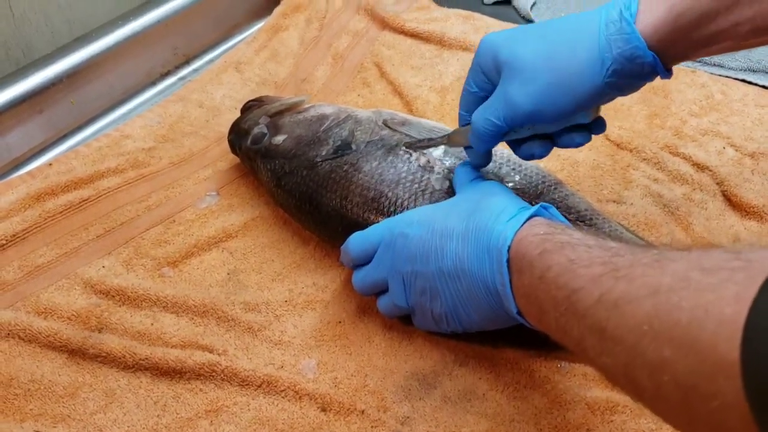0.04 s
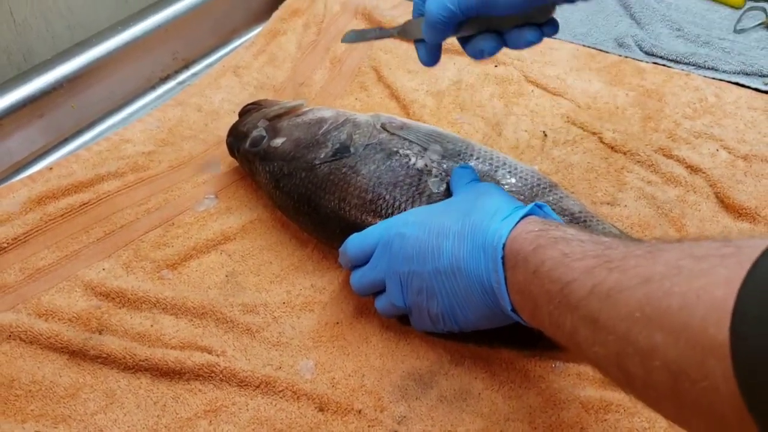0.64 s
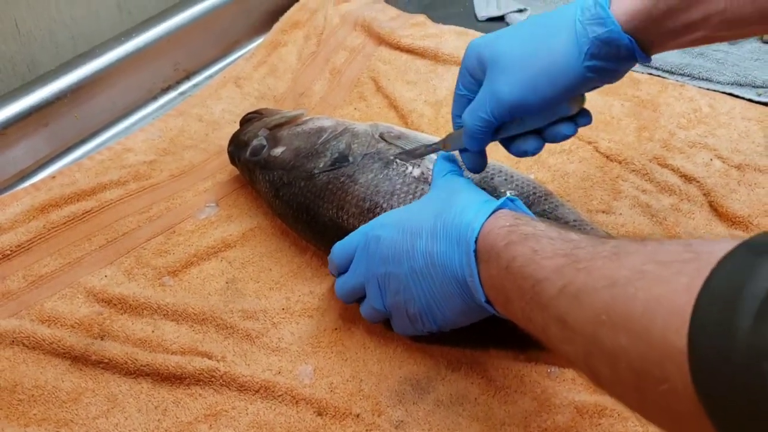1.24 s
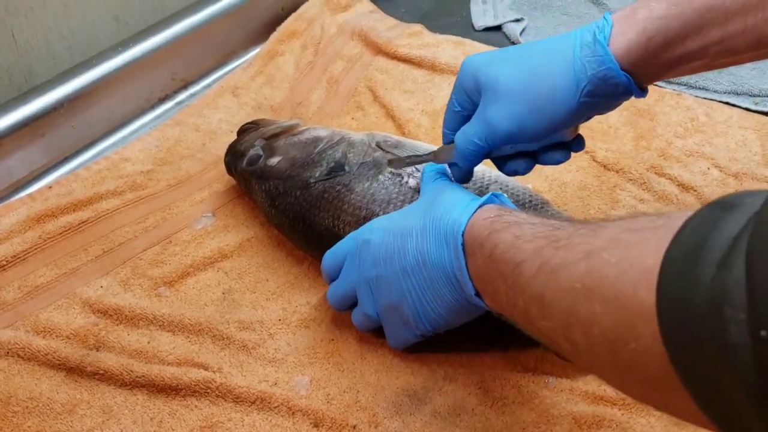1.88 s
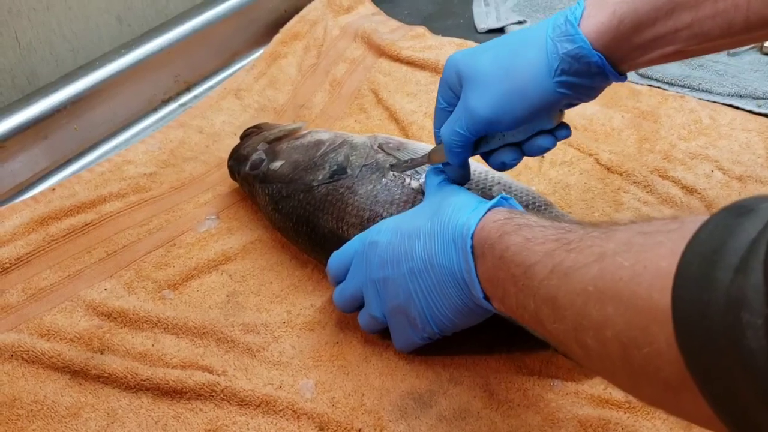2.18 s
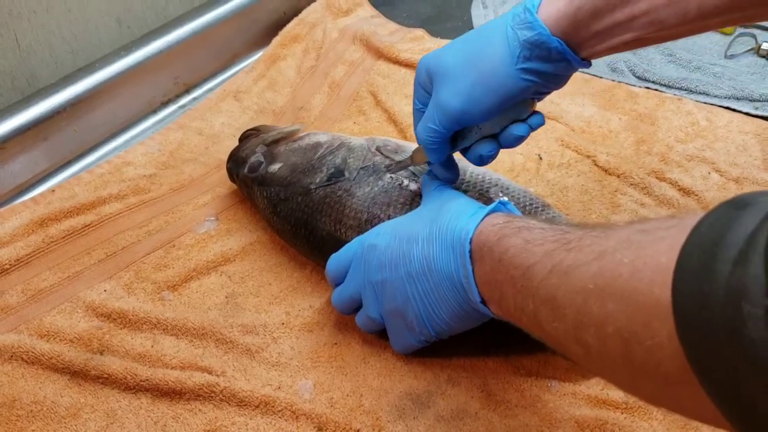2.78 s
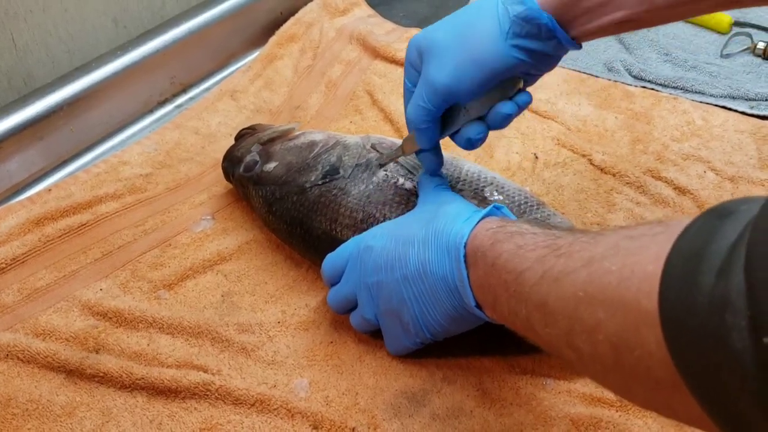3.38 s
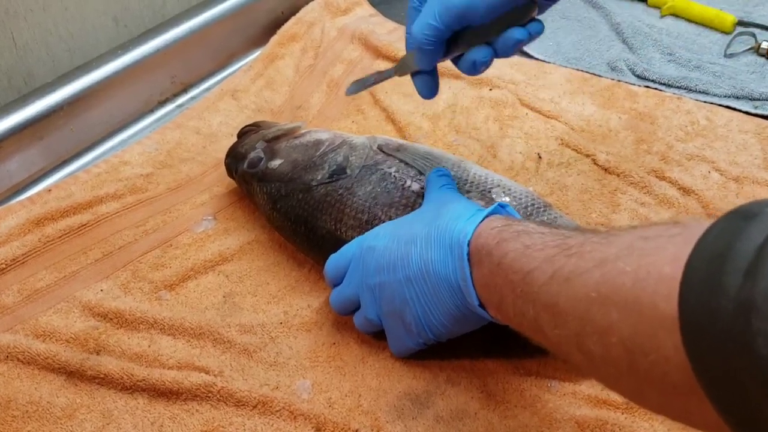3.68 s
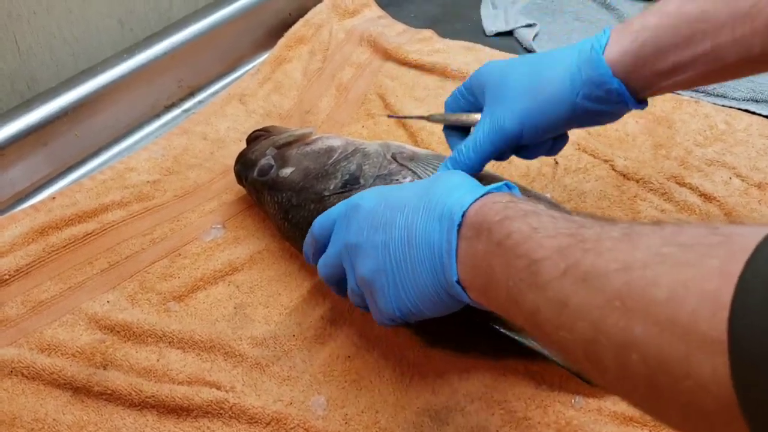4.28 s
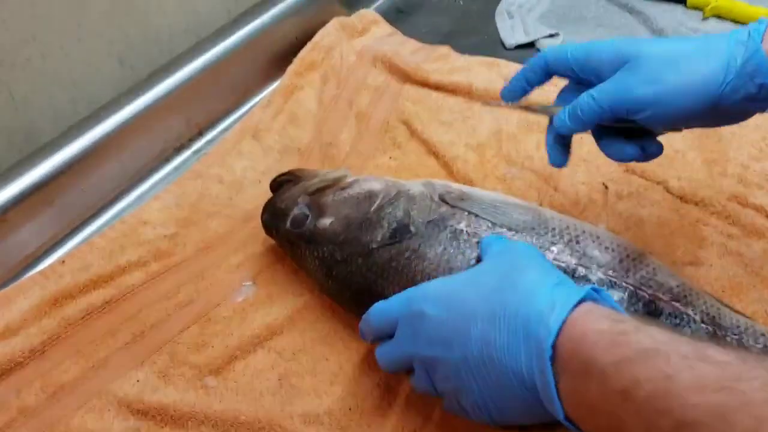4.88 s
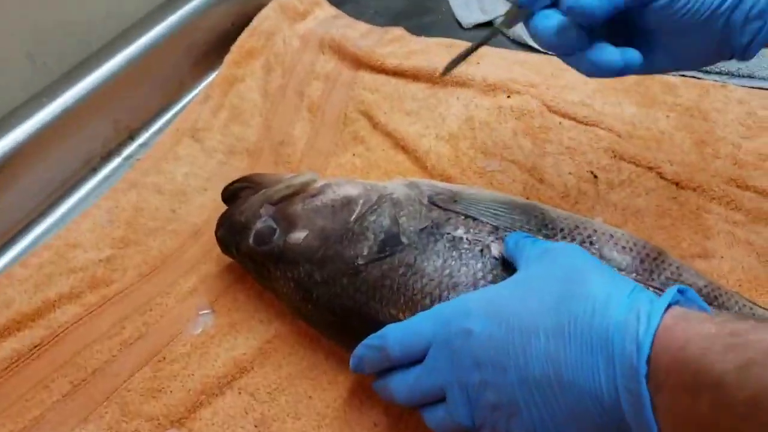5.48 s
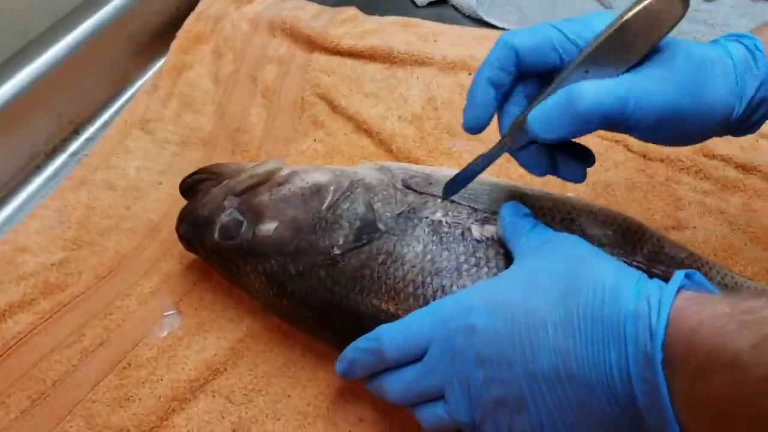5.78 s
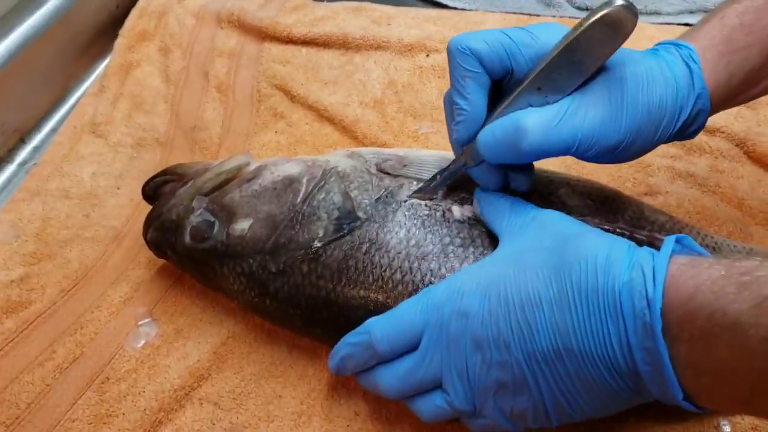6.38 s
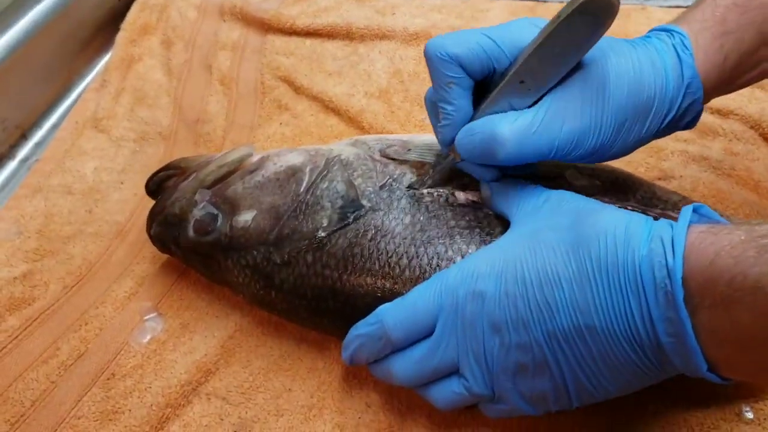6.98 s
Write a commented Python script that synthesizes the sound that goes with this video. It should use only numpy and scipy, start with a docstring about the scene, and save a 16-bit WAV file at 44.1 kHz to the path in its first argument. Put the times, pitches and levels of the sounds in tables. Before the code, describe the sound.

A scalpel picks at a fish's scales, making crisp, irregular ticks, short scrapes and faint wet rubbing. Twice, early and midway, the blade springs free with a sharp click and a brief metallic ring. A quick swipe across the skin follows, then a soft cloth rustle, more ticks and a dull thud at the end. It is heard up close in a small hard-walled room with low ventilation rumble.

```python
"""Scaling a fish with a scalpel

The fish lies on a towel in a small hard-walled room. Friction makes the edge scrape and squeak, and
scales tick as they fracture. Twice the blade springs free and rings in its modes, and once it swipes
across the skin. Jolts thud dully, loudest at the end. A sleeve rustles; ventilation rumbles behind."""
import sys
import numpy as np
from scipy import signal
from scipy.fft import rfft, irfft, next_fast_len
from scipy.io import wavfile
from scipy.ndimage import uniform_filter1d, map_coordinates

SR = 44100
rng = np.random.default_rng(int(sys.argv[2]) if len(sys.argv) > 2 else 0)


def inscribe(sig):
    """Save sig as 16-bit PCM at rate SR to the path in sys.argv[1].

    A 1-D sig is mono; a 2-D sig holds one channel per row.
    Samples are clipped to [-1, 1] before scaling.
    """
    pcm = np.round(np.clip(np.atleast_2d(sig).T, -1, 1) * 32767)
    wavfile.write(sys.argv[1], SR, pcm.astype(np.int16))


N = 319398
TIME = np.arange(N) / SR
EVENT_N, LEAD_S = SR // 2, 0.12
EVENT_TIME = np.arange(EVENT_N) / SR - LEAD_S  # time around one event [s]


def amp(db):
    """Decibels to amplitude gain."""
    return 10 ** (np.asarray(db) / 20)


def unit(x):
    """Scale to rms 1."""
    return x * (np.mean(x * x) + 1e-20) ** -.5


def along(points, hz):
    """Interpolate (frequency [Hz], value) points on a logarithmic frequency axis."""
    knots_hz, values = np.transpose(points)
    return np.interp(np.log(hz + 1), np.log(knots_hz + 1), values)


def wobble(rate):
    """A smooth random curve with rate knots a second."""
    return map_coordinates(rng.standard_normal(int(N * rate / SR) + 4), [TIME * rate])


def burst(t, rise_s, fall_s):
    """An envelope that grows exponentially to 1 at t = 0, then decays."""
    return np.exp(-np.abs(t) / (np.where(t < 0, rise_s, fall_s) + 1e-5))


def noise(size):
    """Independent white noise, left and right."""
    return rng.standard_normal((2, size))


def grains(size, per_s, spread_db):
    """Shot noise: tiny fractures of uneven size at random moments."""
    hits = rng.random(size) < per_s / SR
    return unit(noise(size) * hits * amp(spread_db * rng.standard_normal(size)))


def patchy(size, depth_db):
    """Noise whose level drifts in small patches of time and frequency."""
    spectra = signal.stft(noise(size), nperseg=1024)[2]
    drift = uniform_filter1d(rng.standard_normal(spectra.shape[1:]), size=4, axis=0)
    drift = uniform_filter1d(drift, size=10, axis=1)
    return signal.istft(spectra * amp(depth_db * unit(drift)), nperseg=1024)[1][:, :size]


def filtered(x, response):
    """Multiply the spectrum of x by a frequency response."""
    size = x.shape[-1]
    padded = next_fast_len(size + 2048, True)
    return irfft(rfft(x, padded) * response(np.fft.rfftfreq(padded, 1 / SR)), padded)[..., :size]


def coloured(x, spectrum, body_db=0):
    """Shape x by a spectrum, at rms 1; body lifts the part below 8 kHz."""
    return unit(filtered(x, lambda hz: amp(along(spectrum, hz) + body_db / (1 + (hz / 8000) ** 6))))


def resonance(hz, centre_hz, width_hz):
    """Response of two equal resonators in cascade, each width_hz wide."""
    return (1j * hz * width_hz / (centre_hz ** 2 - hz ** 2 + 1j * hz * width_hz)) ** 2


def resonant(x, modes):
    """Pass x through parallel resonances, at rms 1."""
    return unit(filtered(x, lambda hz: sum(amp(db) * resonance(hz, centre_hz, 2 * half_width_hz)
                                           for centre_hz, half_width_hz, db in modes)))


def narrow(size, centre_hz, width_hz):
    """Narrow-band noise, heard as a rough tone."""
    return unit(filtered(noise(size), lambda hz: resonance(hz, centre_hz, width_hz)))


def panned(x, pan_db):
    """Set the level difference, left minus right, at constant power."""
    return x * unit(amp([[pan_db / 2], [-pan_db / 2]]))


def add_event(track, time_s, x):
    """Mix x into the track with the zero of EVENT_TIME at time_s."""
    start = round((time_s - LEAD_S) * SR)
    x = x[:, max(-start, 0):max(N - start, 0)]
    start = max(start, 0)
    track[:, start:start + x.shape[1]] += x


def in_room(x, room_db):
    """Reverberation: add a diffuse tail in which each frequency decays at its own rate."""
    # room decay: (frequency [Hz], reverberation time [s])
    t60 = [(100, 0.65), (500, 0.93), (2000, 0.47), (4500, 0.38), (9000, 0.35), (15000, 0.24)]
    hz, t, spectra = signal.stft(noise(EVENT_N), SR, nperseg=256)
    decay = amp(-60 * t / along(t60, hz)[:, None])
    build_up = 1 - np.exp(-t / 0.0023)
    tail = signal.istft(spectra * decay * build_up, SR, nperseg=256)[1]
    tail /= np.linalg.norm(tail, axis=1, keepdims=True)
    return x + amp(room_db) * signal.fftconvolve(x, tail, axes=1)[:, :x.shape[1]]


def ventilation():
    """Flow noise, duct resonances and motor hum, mostly on the right, with a thin steady hiss."""
    # rumble on each side, and hiss: (frequency [Hz], relative density [dB])
    left_spectrum = [(20, 4.5), (55, 2.5), (100, -7), (170, -12.5), (300, -3), (450, 3.5), (700, -3),
                     (1050, -9.5), (1500, -18), (3000, -26), (8000, -51), (16000, -62)]
    right_spectrum = [(20, -21.5), (35, -30), (55, 6), (78, -3.5), (98, -1), (135, -12.5), (190, -13),
                      (260, -15), (430, -22.5), (600, -33), (1000, -37.5), (1500, -44), (3500, -49.5),
                      (8000, -58)]
    hiss_spectrum = [(2000, -12.5), (7500, -21.5), (10000, -8), (12000, 1), (14000, 1.5), (16000, 2)]
    # duct modes: (frequency [Hz], width [Hz], level at lean 0 [dB], level at lean 1 [dB], pan [dB])
    duct_modes = [(97.5, 36, -63.5, -60.5, -26), (121, 65, -80.5, -62, -24), (248, 19, -67.5, -65, -16),
                  (297, 140, -70.5, -93, -18.5), (423.6, 87, -64, -73.5, -4.5), (1060, 200, -96, -74, 9.5)]
    # the listener leans in: (time [s], lean [0-1])
    leaning = [(4.3, 0), (4.9, 0.94)]
    lean = np.interp(TIME, *np.transpose(leaning))
    left, right = patchy(N, depth_db=2)
    air = np.array([amp(-61.5) * coloured(left, left_spectrum),
                    amp(-49) * coloured(right, right_spectrum)])
    for hz, width_hz, back_db, near_db, pan_db in duct_modes:
        air += panned(narrow(N, hz, width_hz), pan_db) * amp(back_db + lean * (near_db - back_db))
    hum = amp(-52 + 2.4 * wobble(2.2)) * np.sin(2 * np.pi * 59.5 * TIME + 0.46 * wobble(1.7))
    hiss = amp(-67) * coloured(noise(N), hiss_spectrum)
    return air + panned(hum, -24) + panned(hiss, 6.4)


def cloth_rustles():
    """Sliding friction: sleeve and towel brush as the arm changes its grip."""
    # swells of rustling: (peak time [s], level [dB], rise [s], fall [s])
    brushes = [(3.8, -58.5, .04, 0.069), (4.729, -69.5, .04, 0.43), (5.16, -52, 0.06, 0.098),
               (5.53, -62.5, 0.034, 0.068), (5.72, -60.5, 0.041, 0.056)]
    # soft cloth: (frequency [Hz], relative density [dB])
    cloth_spectrum = [(200, -10), (500, 8.5), (950, 0.5), (1400, -10.5), (2100, -10.5), (3200, -18),
                      (6000, -48)]
    sliding = sum(amp(db) * burst(TIME - time_s, rise_s, fall_s) for time_s, db, rise_s, fall_s in brushes)
    return panned(sliding * coloured(patchy(N, depth_db=5), cloth_spectrum), -2.8)


def jolts():
    """Damped resonances: low, dull thuds, mostly on the right, each with a short slap."""
    # jolts: (time [s], thud gain [dB], slap level [dB], thud rise [s])
    jolt_events = [(0.573, -30.5, -65, 0.004), (0.603, -31.5, -35, 0.00033), (1.802, -40.5, -71, 0.0011),
                   (3.563, -33, -67, 0.0007), (4.518, -37.5, -42.5, 0.0043), (4.548, -29.5, -69, 0.018),
                   (6.08, -42, -56.5, 0.0044), (7.087, -11, -33.5, 0.028), (7.13, -24, -41, 0.0064)]
    # resonances of the thud: (frequency [Hz], width [Hz], relative level [dB])
    thud_modes = [(56.3, 9, -3.5), (98, 15, -10), (150, 41, 0.5), (226.7, 89, -1), (284, 24, -12.5),
                  (439, 100, -31)]
    # the slap: (frequency [Hz], relative density [dB])
    slap_spectrum = [(100, -5), (300, -2.5), (700, -2.5), (1200, -2), (1600, -5), (2400, -3), (3500, -17),
                     (7000, -29), (15000, -49.5)]
    out = np.zeros((2, N))
    age = np.maximum(EVENT_TIME, 0)
    for time_s, thud_db, slap_db, rise_s in jolt_events:
        thud = np.zeros(EVENT_N)
        for hz, width_hz, db in thud_modes:
            decay = np.exp(-np.pi * width_hz * age)
            thud += amp(db) * decay * np.sin(2 * np.pi * (hz * age + rng.random()))
        thud *= amp(thud_db) * (1 - np.exp(-age / rise_s))
        slap = amp(slap_db) * coloured(noise(EVENT_N), slap_spectrum)
        slap *= burst(EVENT_TIME - 0.001, 0.0017, 0.013)
        add_event(out, time_s, panned(thud, -26) + in_room(panned(slap, -1), room_db=-3))
    return out


def skin_rubbing():
    """Friction noise: edge and gloves on wet skin give a crinkling fizz over a lower rasp."""
    # spells of rubbing: (start [s], end [s], fizz level [dB], rasp level [dB])
    rubs = [(0.358, 0.54, -67, -85), (1.596, 1.8, -60, -76), (1.83, 1.98, -62.5, -69),
            (2.241, 2.3, -61.5, -88), (2.49, 2.572, -60.5, -65.5), (2.947, 3.02, -67, -75),
            (3.56, 3.83, -56.5, -64.5), (4.15, 4.99, -63, -84), (5.111, 5.359, -61, -79.5),
            (5.496, 6.006, -65, -83.5), (6.55, 6.77, -65, -80), (6.97, 7.24, -60, -70.5)]
    # the two bands of friction noise: (frequency [Hz], relative density [dB])
    fizz_spectrum = [(3000, -22), (6000, -25), (9000, -11.5), (11800, -2), (15500, -5)]
    rasp_spectrum = [(800, -17.5), (2000, 5.5), (3200, -1), (4200, 6.5), (5600, 4), (8000, 5),
                     (12000, -27.5)]
    fizz_gain, rasp_gain = amp(-75), amp(-88)  # the hands only holding on
    for start_s, end_s, fizz_db, rasp_db in rubs:
        contact = burst(TIME - np.clip(TIME, start_s, end_s), rise_s=0.02, fall_s=0.052)
        fizz_gain = np.maximum(fizz_gain, amp(fizz_db) * contact)
        rasp_gain = np.maximum(rasp_gain, amp(rasp_db) * contact)
    pressure = amp(3.1 * wobble(25))
    fizz = fizz_gain * coloured(grains(N, per_s=14000, spread_db=2.5), fizz_spectrum)
    rasp = rasp_gain * coloured(grains(N, per_s=9000, spread_db=2), rasp_spectrum)
    pops_per_s, pop_decay_s = 42, 0.0022  # tiny wet ticks
    pops = (rng.random(N) < pops_per_s / SR) * rng.random(N)
    crinkle = amp(-11.5) * unit(signal.lfilter([1], [1, -np.exp(-1 / (pop_decay_s * SR))], pops))
    return pressure * (panned(fizz * (1 + crinkle), 22) + panned(rasp, 19))


def squeaks():
    """Stick-slip of the edge and the rubber gloves unevenly drives one resonance per squeak."""
    # squeaks: (peak time [s], level [dB], frequency [Hz], quality factor [1], pan [dB], decay [s])
    slips = [(0.559, -47.5, 4150, 8.1, -17, 0.019), (0.583, -37, 14000, 10, 3.5, 0.019),
             (0.613, -25, 9700, 17, 7, 0.0077), (0.613, -22, 15300, 25, 2, .011),
             (1.681, -76, 1870, 20, 1, .06), (2.17, -74.5, 2860, 16.5, 15, .13),
             (2.413, -70.5, 2820, 22, 13.5, 0.084), (3.564, -16, 11380, 11, 9, 0.0045),
             (4.524, -38.5, 3380, 3.8, 10, 0.0089), (5.286, -65, 5680, 41, 20, .02),
             (6.096, -56, 2140, 11, 13, 0.03), (6.092, -54.5, 644, 10, -1, 0.03),
             (6.222, -44.5, 4150, 16, 9, .005), (6.777, -72, 1903, 8, 13.5, 0.064),
             (7.012, -68, 2690, 3.3, 13, 0.11)]
    out = np.zeros((2, N))
    for time_s, db, hz, q, pan_db, decay_s in slips:
        squeak = amp(db) * narrow(EVENT_N, hz, hz / q) * burst(EVENT_TIME, 0.53 * decay_s, decay_s)
        add_event(out, time_s, panned(squeak, pan_db))
    return in_room(out, room_db=-6.5)


def fast_strokes():
    """Superposed fractures: the edge tears through so many small scales that they merge into noise."""
    # short strokes: (peak time [s], level [dB], body [dB], pan [dB], decay [s])
    strokes = [(0.008, -34.5, 5.5, 12, .02), (0.612, -28.5, 14, -3, 0.03), (1.27, -46, -8, 13, 0.012),
               (1.858, -47.5, 3, 4.5, 0.027), (2.269, -50, 17, 16, 0.028), (2.81, -44.5, 8.5, 15, 0.026),
               (3.303, -55.5, 6.5, 15, 0.023), (3.56, -23.5, 4.5, 0.5, 0.022), (4.515, -31, 6.5, 13, 0.029),
               (5.531, -49, 6, 17, 0.034), (5.686, -49, -0.5, 15, .048), (7.133, -38, 9, 8.5, .038)]
    # tearing along the skin: (frequency [Hz], relative density [dB])
    skin_spectrum = [(300, -6), (1300, -18), (3000, -14.5), (4100, -8.5), (5500, -12), (8500, -4.5),
                     (11500, 7), (15500, 5)]
    out = np.zeros((2, N))
    for time_s, db, body_db, pan_db, decay_s in strokes:
        tear = coloured(grains(EVENT_N, per_s=18000, spread_db=5), skin_spectrum, body_db)
        tear *= amp(db) * burst(EVENT_TIME, 0.72 * decay_s, decay_s)
        add_event(out, time_s, in_room(panned(tear, pan_db), room_db=-8))
    return out


def blade_flicks():
    """Free vibration: the bent blade slips off a scale, clacks on bone and rings down in its modes."""
    # releases: (time [s], slip [dB], slip pan [dB], slip decay [s], clack [dB], ring [dB], room [dB])
    flicks = [(0.6067, -23, 15, 0.025, -17, -44, 2.5), (3.5614, -20, 15, 0.025, -25.5, -35.5, -6)]
    # the slipping edge: (frequency [Hz], relative density [dB])
    slip_spectrum = [(300, -14), (1300, -16.5), (2000, -25.5), (3100, -17.5), (4200, -8.5), (5600, -5.5),
                     (6800, -6.5), (8500, -8.5), (10000, -1), (12000, 4.5), (15500, 4)]
    # blade on bone: (frequency [Hz], half-width [Hz], relative gain [dB])
    clack_modes = [(159, 150, -7.5), (280, 99, -0.5), (1910, 180, -4), (4510, 110, 12), (5450, 600, 4),
                   (9750, 710, -6), (11300, 550, -7), (15200, 900, -14.5)]
    # modes of the blade: (frequency [Hz], width [Hz], relative level [dB], decay [s])
    blade_modes = [(2020, 180, -11, 0.03), (3800, 160, -12.5, .025), (4131, 500, 1.5, 0.04),
                   (4830, 250, -3.5, 0.0091), (5620, 280, 2, 0.034), (8200, 720, -3, 0.034),
                   (9475, 190, 4.5, 0.024), (10200, 660, 3.5, 0.035), (11900, 540, -8.5, 0.033),
                   (15700, 350, 8, 0.03)]
    out = np.zeros((2, N))
    since_impact = EVENT_TIME - 0.003
    for time_s, slip_db, pan_db, slip_s, clack_db, ring_db, room_db in flicks:
        slip = amp(slip_db) * coloured(noise(EVENT_N), slip_spectrum)
        slip *= burst(EVENT_TIME - 0.002, 0.0013, slip_s)
        clack = amp(clack_db) * resonant(noise(EVENT_N), clack_modes)
        clack *= burst(since_impact, 0.0013, 0.0034)
        ring = sum(amp(db) * narrow(EVENT_N, hz, width_hz) * burst(since_impact, 0.0014, decay_s)
                   for hz, width_hz, db, decay_s in blade_modes)
        blade = panned(slip, pan_db) + panned(amp(ring_db) * ring, 9.2)
        add_event(out, time_s, in_room(blade, room_db) + panned(clack, -18))
    return out


def scale_ticks():
    """Brittle fracture: a scale creaks under the edge, then cracks; a thick one has more body and pings."""
    # cracking scales: (time [s], level [dB], body [dB], ping frequency [Hz], ping pan [dB], decay [s])
    ticks = [(0.5456, -41.5, -11.5, 4220, 2.5, 0.0052), (0.5674, -34, -10.5, 4800, 3.5, 0.0049),
             (0.592, -36.5, 6, 4700, -15.5, 0.0024), (0.9968, -43.5, -28.5, 7000, 8.5, 0.0031),
             (1.2058, -31.5, -24, 7000, 9.5, 0.0033), (1.605, -44.5, -16.5, 7000, 13, 0.0045),
             (1.8028, -30, 3, 7020, 10.5, 0.00076), (1.8496, -26, -12, 7060, 11.5, 0.00079),
             (1.8603, -26, -17, 4650, 9, 0.0017), (2.164, -42, -21, 6000, 11, 0.0018),
             (2.4522, -55, 4, 4500, 10, 0.0058), (2.502, -45, 3.5, 5300, 2, 0.0025),
             (2.777, -44.5, -14, 7000, 12, .005), (2.793, -42, -10, 7000, 12, 0.0035),
             (2.836, -50.5, 3, 3390, 13.5, 0.0061), (2.973, -50.5, -1, 5360, 14, 0.0088),
             (3.463, -33, -4, 4190, 7, 0.0018), (3.494, -38, -1.5, 5000, 6.5, .0018),
             (3.5187, -30.5, -1, 6940, 4.5, 0.0023), (3.529, -43, 8.5, 4730, -3.5, 0.0047),
             (4.426, -42.5, -23.5, 7060, 14, 0.0049), (4.494, -31.5, -24.5, 7000, 8, .0025),
             (4.694, -44, -24, 7030, 11, 0.0038), (6.0462, -32.5, -9, 6640, 14, 0.0018),
             (6.078, -35.5, -4, 4860, 14, 0.0031), (6.2201, -32.5, -12.5, 4310, 7, 0.0031),
             (6.538, -42.5, -6.5, 6050, 2, 0.0023), (7.0922, -40, -3.5, 2020, 2, .003)]
    # a crack: (frequency [Hz], relative density [dB])
    crack_spectrum = [(300, -31), (1300, -34), (2100, -14.5), (3000, -48), (4000, -10.5), (7000, -7),
                      (9500, -6.5), (12000, -3.5), (15500, -5)]
    ping_q = 1.7
    out = np.zeros((2, N))
    for time_s, db, body_db, ping_hz, pan_db, decay_s in ticks:
        snap = burst(EVENT_TIME - 0.0015, 0.0011, decay_s)
        creak = amp(-21) * burst(EVENT_TIME, 0.0057, 0.024)
        crack = amp(db) * (snap + creak) * coloured(noise(EVENT_N), crack_spectrum, body_db + 2)
        ping = amp(db + body_db) * snap * narrow(EVENT_N, ping_hz, ping_hz / ping_q)
        add_event(out, time_s, in_room(panned(crack, 15) + panned(ping, pan_db), room_db=-5.5))
    return out


def scene():
    """Superposition of the work on the fish and the room's own sound."""
    return (scale_ticks() + blade_flicks() + squeaks() + cloth_rustles() + fast_strokes()
            + jolts() + skin_rubbing() + ventilation())


def record(dry):
    """Frequency response: the right microphone has a treble dip near 7.6 kHz; both are band-limited."""
    # treble dip of the right microphone: (frequency [Hz], gain [dB])
    right_dip = [(5500, 0), (7600, -12), (10000, -7), (13000, -1.5)]
    top_hz = 15850
    return filtered(dry, lambda hz: np.array([np.ones_like(hz), amp(along(right_dip, hz))]) * (hz < top_hz))


dry = scene()
out = record(dry)
inscribe(out)
```